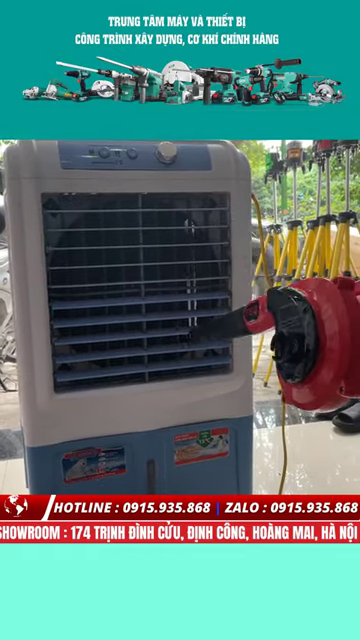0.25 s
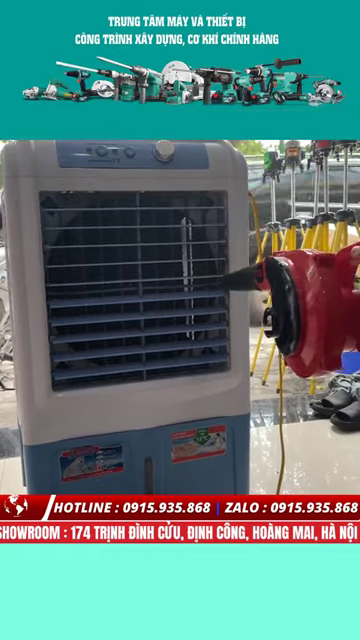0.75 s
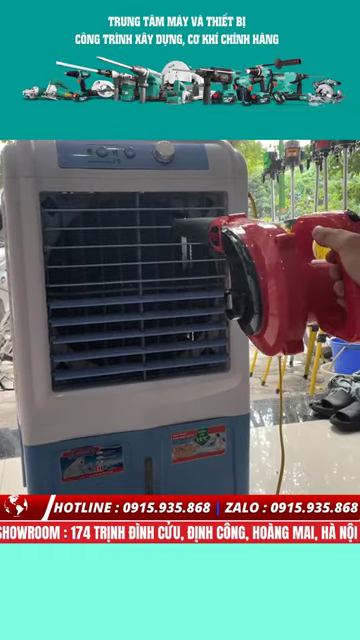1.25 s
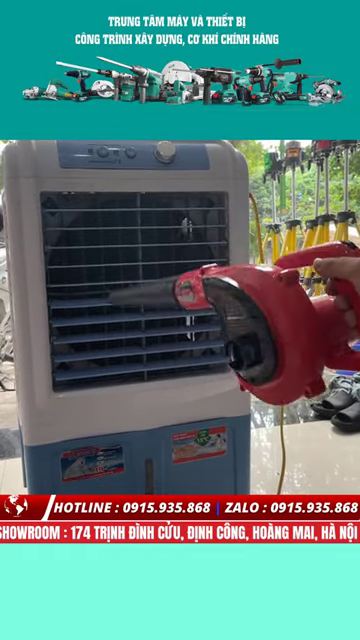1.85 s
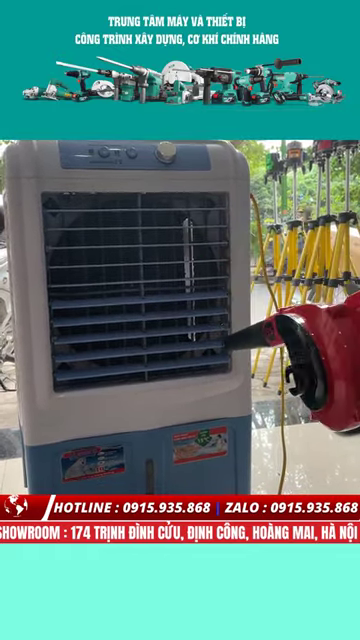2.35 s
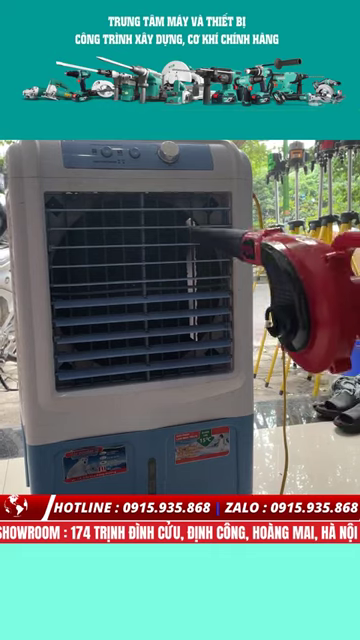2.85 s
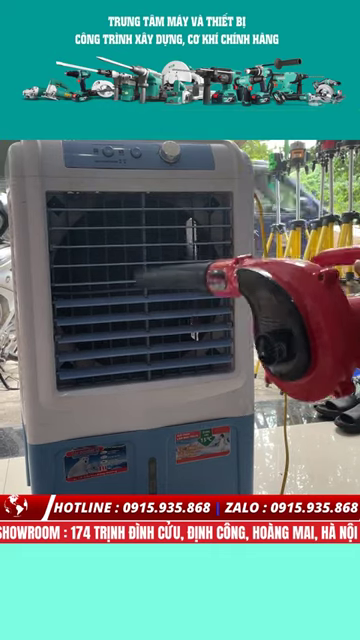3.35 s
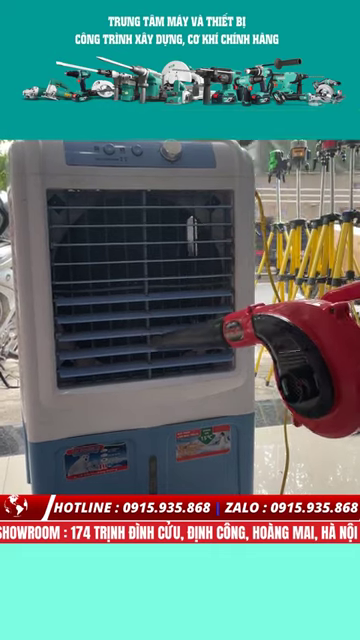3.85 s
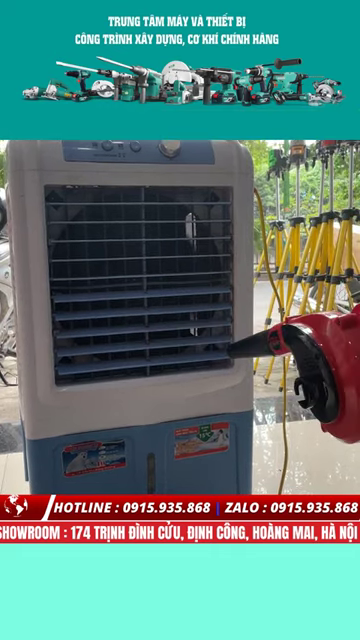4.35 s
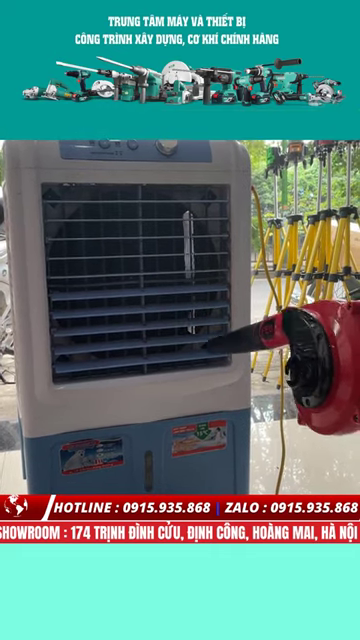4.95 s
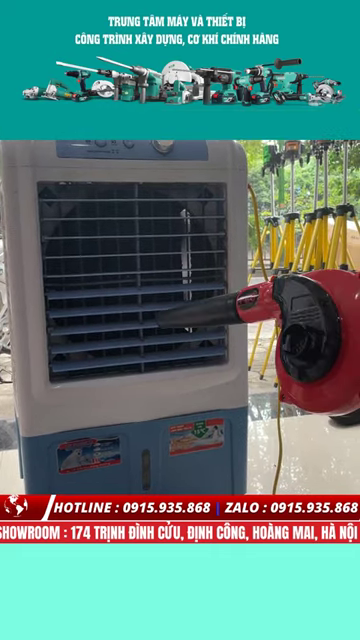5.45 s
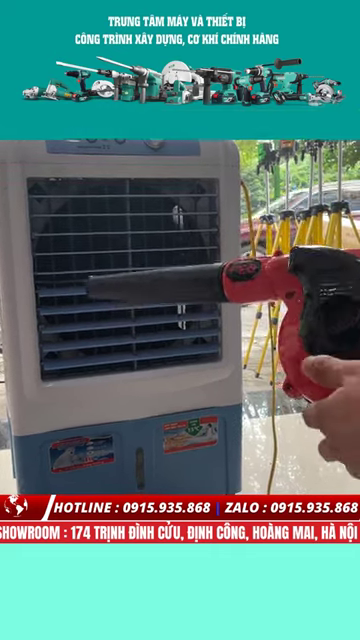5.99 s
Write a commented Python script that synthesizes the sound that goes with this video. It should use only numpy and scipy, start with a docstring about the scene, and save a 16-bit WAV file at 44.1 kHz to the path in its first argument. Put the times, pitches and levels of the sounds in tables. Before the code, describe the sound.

A handheld electric blower runs close by in an open shop front: dense rushing air, a steady high whine and fine motor whirring. Sweeping a cooler's grille makes the roar flutter and hollow howls come and go. Near the end it is switched off; the pitch slides down and the air dies quickly. Faint low traffic, a passing motorbike and a small idling engine lie underneath. Close stereo microphone.

```python
"""In an open shop front a handheld electric blower sweeps an air cooler's grille, then is switched off.
Its jet is shaped noise that roars on the slats and howls at edges, and dies with the shaft's speed.
Ten blades whine over rotor, commutator and bearing lines, all sines locked to the coasting shaft.
In the street noise rumbles, a small engine idles in low puffs that ring its exhaust,
and a motorbike goes by as three multiples of its firing rate."""
import sys
import numpy as np
from scipy import signal
from scipy.fft import rfft, irfft
from scipy.io import wavfile

SR = 44100
rng = np.random.default_rng(int(sys.argv[2]) if len(sys.argv) > 2 else 0)


def waveform_to_disk(signal):
    """Save audio, clipped to [-1, 1], as 16-bit WAV at the path in sys.argv[1]."""
    frames = np.transpose(np.atleast_2d(signal))
    scaled = np.clip(frames, -1, 1) * 32767
    samples = np.round(scaled).astype(np.int16)
    wavfile.write(sys.argv[1], SR, samples)


N = 274302
TIME = np.arange(N) / SR   # seconds
FREQS = np.maximum(np.arange(N // 2 + 1) * SR / N, 1)   # Hz, kept above zero for the logarithm
SIDES = np.array([[1], [-1]])   # left, right
FULL_SPEED_HZ, COAST_SPEED_HZ = 261, 120   # shaft speeds at which the driven and coasting levels hold

# Difference between left and right channels. Each row: frequency in Hz, coherence 0-1 (noise only),
# phase by which the left leads in radians (used above 400 Hz), left minus right in dB.
STEREO = [(270, 1.0, 0, 0), (370, 0.75, 0.05, -1.1), (440, .85, .2, -.7), (520, 0.88, 0.3, -2.8),
          (670, .55, .8, 3.6), (730, 0.38, 0.1, 2.8), (860, .75, .1, 3), (1130, 0.84, 0, 0.6),
          (1330, 0.6, 0.5, 3.2), (1470, .3, -.1, 2), (1700, .55, -.3, 0), (1950, 0.15, -1.8, 1.8),
          (2400, 0.7, 0.4, 0), (2600, .62, .7, .5), (2850, .42, .7, 1.3), (3500, 0.52, 0.3, 2.8),
          (4100, .66, .2, 1.3), (5100, 0.55, 0.8, 3.12), (6500, 0.67, -0.66, 1.22), (7400, .7, -2.2, 1),
          (8100, 0.99, -3.09, 0.1), (8500, .97, -3.25, 0), (9500, 0.62, -4.34, -0.2),
          (11500, 0.98, -6.27, 0.02), (13000, 0.56, -7.29, -0.03), (14400, 0.99, -9.4, 0)]


def from_db(db):
    """Level is logarithmic: 20 dB is a tenfold amplitude."""
    return 10 ** (np.asarray(db) / 20)


def rms_one(x):
    """Effective value: scale a signal to a root mean square of 1."""
    return x / np.sqrt(np.mean(x ** 2) + 1e-20)


def in_time(rows):
    """Linear interpolation of each column of a time curve at every sample."""
    seconds, *columns = np.transpose(rows)
    return [np.interp(TIME, seconds, column) for column in columns]


def in_frequency(rows):
    """Interpolation of each column of a spectrum along logarithmic frequency."""
    hz, *columns = np.transpose(rows)
    return [np.interp(np.log(FREQS), np.log(hz), column) for column in columns]


def drift(rate_hz):
    """Random fluctuation of spread 1: white noise through a two-pole low-pass at this rate."""
    step = 40   # samples between computed points
    pole = np.exp(-2 * np.pi * rate_hz * step / SR)
    white = rng.standard_normal(N // step + 2002)
    slow = signal.lfilter([1], [1, -2 * pole, pole * pole], white)[2000:]   # settled part
    return np.interp(np.arange(N) / step, np.arange(len(slow)), rms_one(slow))


def turns(rate_hz):
    """Phase is the time integral of angular frequency."""
    return 2 * np.pi * np.cumsum(rate_hz) / SR


def tone(angle, scatter, flutter_hz):
    """Multipath interference: a direct sine of rms about 1 plus shifting reflections, unlike at each ear."""
    angle = angle + rng.uniform(0, 2 * np.pi)
    along, across = scatter * np.array([[drift(flutter_hz), drift(flutter_hz)] for _ in range(2)])
    wave = (1 + along) * np.cos(angle) + across * np.sin(angle)
    return wave / np.sqrt(.5 + scatter ** 2)


def resonances(table):
    """Resonance: bell-shaped lifts in dB add up; one row of gains for each lift column."""
    hz, width, *lifts_db = np.transpose(table)
    detuning = 2 * (FREQS - hz[:, None]) / width[:, None]
    return from_db(np.array(lifts_db) @ (1 / (1 + detuning ** 2)))


def turbulence():
    """Partial coherence: the spectrum of white noise, shared between two ears as mid and side."""
    alike = np.clip(in_frequency(STEREO)[0], 0, .998)
    mid, side = rfft(rng.standard_normal((2, N)))
    return np.sqrt(1 + alike) * mid + np.sqrt(1 - alike) * side * SIDES


def reflections(x, echo, delays_ms, sway_ms):
    """Delayed reflection: nearby surfaces throw sound back over paths that change as the hand moves."""
    out, now = x, np.arange(N)
    sway = sway_ms * drift(0.397)
    for delay_ms in delays_ms:
        source_sample = now - (delay_ms + sway) * SR / 1000
        out = out + echo * np.array([np.interp(source_sample, now, ear) for ear in x])
    return out / np.sqrt(1 + len(delays_ms) * echo ** 2)


def rumble():
    """Broadband street noise: a shaped random spectrum whose level rises and falls slowly."""
    # Colour. Each row: frequency in Hz, relative spectral level in dB.
    colour = [(20, -11), (48, 3), (70, -2), (120, 2), (210, -2), (370, -20), (520, -19), (1200, -25)]
    # Loudness. Each row: time in seconds, level in dB.
    traffic = [(0, -41), (.9, -43), (2.2, -40.5), (2.7, -45), (3.2, -41.5), (4.2, -40.5), (4.6, -45),
               (5.3, -43.5), (6.2, -41)]
    noise = rms_one(irfft(turbulence() * from_db(in_frequency(colour)[0]), N))
    return from_db(in_time(traffic)[0]) * noise


def motorbike():
    """Harmonics of the firing rate: they swell as it nears, then sink and dull on a shut throttle."""
    firing_hz, idle_hz, throttle_off_s, rev_down_s = 24.2, 20.9, 1.5, 1.35
    # Multiples of the firing rate heard in the exhaust note.
    multiples = [4, 5, 6]
    # Exhaust note. Each row: time in seconds, relative levels of the 4th, 5th and 6th multiple in dB.
    note = [(0.0, -60, -58, -54), (.35, -58, -56, -46), (.47, -56, -54, -40), (.63, -56, -52, -41),
            (.73, -58, -37, -41), (.9, -54, -44, -37.5), (1.0, -48, -37, -37), (1.18, -40, -38, -38),
            (1.45, -44, -37, -35), (1.56, -46, -44, -50), (1.77, -50, -44, -54), (1.88, -50, -36.5, -52),
            (2.05, -48, -36, -52), (2.2, -50, -44, -50), (2.6, -54, -42, -54), (2.9, -60, -54, -62),
            (4.0, -68, -64, -70)]
    since = np.maximum(TIME - throttle_off_s, 0)
    firing = idle_hz + (firing_hz - idle_hz) * np.exp(-since / rev_down_s)
    angle = turns(firing * (1 + 0.0045 * drift(2.7)))
    out = 0
    for k, db in zip(multiples, in_time(note)):
        out = out + from_db(db) * tone(k * angle, scatter=0.16, flutter_hz=6)[0]   # same at both ears
    return from_db(-3) * out


def idling_engine(uneven_db, jitter_s):
    """Impulsive excitation: each firing of one cylinder is a round puff that sets the exhaust ringing."""
    firing_hz, first_s, puff_hz = 21.42, .0135, 100   # puff_hz: spectral peak of a puff
    # Boom of the pipe, then deep ring of the silencer. Each row: frequency in Hz, width in Hz.
    exhaust = [(63, 14), (44, 6)]
    # Each row: time in seconds, relative levels of puffs, pipe boom and silencer ring in dB.
    idle = [(0.0, -48, -45, -58), (0.7, -48, -45, -60), (0.97, -54, -54, -58), (1.12, -48, -40, -57),
            (1.5, -50, -47, -48), (1.75, -48, -42, -46), (2.15, -50, -48, -46), (2.9, -49, -43, -53),
            (3.35, -46, -41.5, -50), (3.8, -47, -47, -51), (4.5, -56, -55, -53), (5.2, -53, -52, -49),
            (5.55, -42.5, -45, -48), (5.8, -41.5, -43, -64), (5.97, -37.5, -43, -62),
            (6.2, -39.5, -43, -62)]
    count = int(N / SR * firing_hz) + 1
    strength, lateness = rng.standard_normal((count, 2)).T
    at = first_s + np.arange(count) / firing_hz + jitter_s * lateness
    nearest = np.clip(np.round((TIME - first_s) * firing_hz).astype(int), 0, count - 1)
    spread = (np.pi * puff_hz * (TIME - at[nearest])) ** 2
    puffs = from_db(uneven_db * strength[nearest]) * (2 * spread - 1) * np.exp(-spread)
    parts = [puffs]
    for hz, width in exhaust:
        parts.append(signal.lfilter(*signal.iirpeak(hz, hz / width, fs=SR), puffs))
    out = 0
    for db, part in zip(in_time(idle), parts):
        out = out + from_db(db + drift(2.5)) * rms_one(part)
    return from_db(-.5) * out


def street():
    """Long wavelengths: low traffic sounds reach both ears nearly alike."""
    return motorbike() + rumble() + idling_engine(uneven_db=2.1, jitter_s=.0011)


def shaft_speed():
    """Equation of motion: a slight sag under power, then a coast against air drag and friction."""
    start_hz, sag_hz_per_s = 261.27, .115
    switch_off_s, current_fade_s = 4.711, .025
    drag_halves_s, friction_hz_per_s = 1.112, 10.05   # drag alone would halve the speed in this time
    driven = start_hz - sag_hz_per_s * np.minimum(TIME, switch_off_s)
    off_s = current_fade_s * np.logaddexp(0, (TIME - switch_off_s) / current_fade_s)   # soft onset
    return driven / (1 + off_s / drag_halves_s) - friction_hz_per_s * off_s


def partials(angle, coasting, lines, scatter, flutter_hz):
    """Order spectrum: shaft-locked lines move from driven to coasting level; higher ones waver more."""
    out, rate = 0, np.gradient(angle) * SR / (2 * np.pi)
    for multiple, full_db, coast_db in lines:
        audible = multiple * rate < SR / 2 * .8   # guards against aliasing
        level = from_db(full_db + (coast_db - full_db) * coasting)
        out = out + audible * level * tone(multiple * angle, scatter * np.sqrt(multiple), flutter_hz)
    return out


def rotor(angle, coasting):
    """Forced vibration: unbalance, its overtones and the 24-bar commutator sound at turn-rate multiples."""
    # Each row: multiple of the turn rate, relative level at full speed in dB, the same coasting.
    lines = [(1, -40.3, -85), (2, -36.6, -80), (18, -63, -70), (19, -66, -69), (24, -64, -52),
             (25, -68, -65), (28, -72, -63), (34, -72, -66), (35, -66, -62), (36, -66, -62), (48, -56, -61),
             (49, -79, -68), (57, -84, -63), (60, -86, -65), (72, -65, -64), (84, -71, -74), (96, -68, -66),
             (120, -73, -67)]
    return from_db(-1.9) * partials(angle, coasting, lines, scatter=0.04, flutter_hz=5.5)


def ball_bearings(angle, coasting, halvings):
    """Amplitude modulation: ball-pass multiples, some shifted by a turn-rate sideband."""
    passes_per_turn, fade_db_per_halving = 4.371, 11   # the fade acts below half speed
    # Each row: multiple of the ball-pass rate, sideband in turns, relative level at full speed in dB,
    # the same coasting.
    bearings = [(3, 1, -52.5, -68), (5, 0, -55, -68), (5, 1, -60, -66), (6, 0, -60, -65), (6, 1, -68, -63),
                (7, 0, -65, -57), (7, 1, -74, -60), (8, 0, -67, -62), (9, 1, -78, -61), (10, 0, -76, -63),
                (10, 1, -77, -65), (12, 0, -78, -64)]
    lines = [(k * passes_per_turn + side, *levels) for k, side, *levels in bearings]
    out = partials(angle, coasting, lines, scatter=.17, flutter_hz=9)
    return out * from_db(-fade_db_per_halving * np.maximum(halvings - 1, 0))


def upper_whines(angle):
    """Directivity: the armature's twelve slots and the blade tone's octave swell as the blower turns."""
    # Each row: time in seconds, relative level of the slot tone in dB, that of the octave in dB.
    swells = [(0, -51, -51), (.6, -50, -49), (1.1, -62, -56), (1.55, -47, -46), (1.85, -42.5, -48),
              (2.25, -55, -52), (2.5, -53, -44), (2.8, -54, -49), (2.95, -47, -54), (3.2, -47, -56),
              (3.45, -46.5, -45.5), (3.65, -44, -46), (4.1, -46, -45.5), (4.25, -51, -54), (4.4, -50, -47),
              (4.7, -57, -58), (4.85, -58, -55), (6.2, -72, -70)]
    slots_db, octave_db = in_time(swells)
    slots = from_db(slots_db) * tone(12 * angle, scatter=.2, flutter_hz=7)
    octave = from_db(octave_db) * tone(20 * angle, scatter=.22, flutter_hz=7)
    return slots + octave


def motor(angle, coasting, halvings):
    """Source and filter: the falling lines sweep through the shell's fixed resonances and dips."""
    # Shell of the motor. Each row: frequency in Hz, width in Hz, lift in dB.
    shell = [(2335, 180, 9.5), (2720, 240, 7), (3130, 150, 3), (3500, 300, -6), (4050, 200, 3),
             (4400, 350, 6.5), (4820, 300, 7), (5180, 200, -3), (5500, 350, 7), (5850, 400, 4),
             (7650, 300, 3), (8750, 600, 4), (9600, 300, 6), (10650, 700, 12), (12080, 500, 12),
             (13600, 900, 7), (15400, 1400, -17)]
    lines = rotor(angle, coasting) + ball_bearings(angle, coasting, halvings) + upper_whines(angle)
    ringing = irfft(rfft(lines) * resonances(shell), N)
    return reflections(ringing, echo=.2, delays_ms=[2.9, 6.7], sway_ms=.1)


def blade_whine(angle, speed, halvings):
    """Blade-pass tone: ten blades a turn, beamed between the ears and swept through the casing."""
    loss_db_per_halving = 9
    # Beam. Each row: time in seconds, level in dB before speed loss and casing, left minus right in dB,
    # phase by which the left leads in radians; the stereo table adds its own differences.
    beam = [(0.0, -43, -2, -1.3), (0.08, -31.5, -6, -.9), (0.3, -39.5, 1, -.5), (0.53, -38.5, -4, -1),
            (0.66, -32, -2, -0.29), (0.94, -33, 1, -.6), (1.04, -37, -1, -4), (1.25, -27.5, -1, 0.6),
            (1.42, -26, -3, 0.4), (1.5, -31, -2, -0.074), (1.71, -30.5, -5, .2), (1.8, -42, 0, 1.1),
            (1.88, -32.5, -2, 0.63), (2.01, -46, 0, 0), (2.1, -40, 0, 0.5), (2.28, -32.5, 1, 1.3),
            (2.4, -31, 5, 0), (2.55, -33, 1, 0.5), (2.68, -34.5, 0, -1.2), (2.74, -46, 0, 1.7),
            (2.86, -34, 3, 1), (2.97, -33.5, 3, 1.3), (3.06, -28.5, -4, 0.9), (3.32, -31.5, -2, -0.024),
            (3.4, -38, 7, 3), (3.56, -40, 1, -0.5), (3.75, -34, 2, -1.5), (3.93, -32, 4, -1.5),
            (4.18, -32.5, 3, -2), (4.3, -51.5, 5, 2), (4.43, -34.5, 7, -.6), (4.65, -35.5, 3, -1),
            (4.71, -46, 3, -.7), (4.77, -35.5, 1, -1)]
    # Fan casing's resonances and dips. Each row: frequency in Hz, width in Hz, lift in dB.
    casing = [(2355, 110, 13), (2265, 50, -9), (2120, 170, 9), (2010, 50, -13), (1880, 260, 9.5),
              (1540, 100, -10), (1440, 80, -10), (1350, 150, 4), (1175, 35, -6), (1060, 220, 11)]
    beam_db, balance_db, lead = in_time(beam)
    level_db = beam_db + SIDES * balance_db / 2 - loss_db_per_halving * halvings
    casing_gain = np.interp(10 * speed, FREQS, resonances(casing)[0])
    wave = tone(10 * angle + SIDES * lead / 2, scatter=0.17, flutter_hz=20)
    return from_db(level_db) * casing_gain * wave


def howls(rough_db):
    """Vortex shedding: where the jet catches a slat or frame, narrow noise bands swell and let go."""
    # Each row: centre in seconds, half length in seconds (to 1/e), frequency in Hz, width in Hz,
    # peak level in dB before the roughness.
    catches = [(.33, 0.34, 4630, 130, -39), (0.848, 0.35, 2440, 260, -32.5),
               (0.955, 0.099, 3790, 258, -32.5), (1.204, 0.028, 980, 150, -34),
               (1.315, 0.021, 1020, 120, -29), (1.65, 0.34, 3330, 300, -39), (2.354, 0.088, 1160, 260, -31),
               (2.44, 0.17, 1560, 560, -29), (2.585, 0.022, 1110, 240, -28), (2.522, .05, 2300, 140, -34.5),
               (3.113, 0.17, 3390, 240, -37), (4.44, 0.13, 1790, 260, -32.5),
               (4.55, 0.35, 2350, 220, -33.5), (4.694, 0.042, 2320, 60, -32.5)]
    out, noise = 0, irfft(turbulence(), N)
    for s, half_length, hz, width, db in catches:
        edges_hz = [hz - width / 2, hz + width / 2]
        band = signal.sosfilt(signal.butter(2, edges_hz, "band", fs=SR, output="sos"), noise)
        swell = np.exp(-np.abs((TIME - s) / half_length) ** 3)
        out = out + from_db(db) * swell * rms_one(band)
    return out * from_db(rough_db * drift(30))


def air(halvings, coasting):
    """Jet turbulence: noise follows speed and aim; the housing's coloration shifts as the jet dies."""
    # Colour of the jet. Each row: frequency in Hz, relative spectral level in dB.
    jet = [(200, -7.5), (380, -9.5), (520, -1.5), (680, -4.5), (1120, 1), (1900, -6.5), (2400, -3.5),
           (3700, -6.5), (5000, -9.5), (7000, -9.5), (9100, -15), (12500, -17), (14000, -18), (15500, -37)]
    # Housing and nozzle. Each row: frequency in Hz, width in Hz, lift at full speed in dB, coasting in dB.
    housing = [(335.5, 110, 4.5, 14.5), (440, 51, 4.5, 7.5), (1046, 120, -1, 7.5), (1130, 110, 1.5, 1),
               (1260, 180, -1.5, -3), (1856, 240, 2.5, 8.5), (2350, 30, 1.5, 4), (2580, 120, 3, -2),
               (2850, 32, 0.5, 9), (3035, 59, 5, 2), (3707, 39, 6, 5), (3860, 64, 4.5, 5),
               (4430, 1300, 3, 4), (5450, 280, 3.5, 0), (6080, 190, 3.5, 3)]
    # Nozzle over the grille. Each row: time in seconds, swing of the slat roar in dB, of the hiss in dB.
    aim = [(0.0, 3, -2), (0.1, 2, -0.5), (0.27, -1.5, -1.9), (0.45, 0.0, -1), (0.68, 2, 1), (0.95, 1, 0.5),
           (1.2, 1, -1), (1.42, -1.2, 0), (1.62, -0.5, -1.8), (2.12, -2, -1.2), (2.3, 4.5, -1.5),
           (2.58, 1, -0.4), (2.7, 1, 0.1), (3.1, 0, -1.5), (3.6, -1.5, -3), (4.25, -1.1, -1.5),
           (4.45, -0.5, 0.2), (4.7, 1.5, -0.5)]
    # Edges in Hz of four bands: body rush, roar on the slats, nozzle rush, hiss.
    edges_hz = [170, 800, 2000, 4000, 18000]
    # Each row, one per band: relative level at full speed in dB, loss in dB per halving of speed,
    # share of the roar's swing, share of the hiss's swing, steady rubbing noise of the motor in dB.
    bands = [(-33.5, 14, 0.21, 0.12, -45.5), (-29, 18.5, 0.95, .05, -48), (-30, 22, 0.55, 0.51, -51),
             (-31, 21.5, 0.3, 1, -44)]
    # Flutter of the eddies in each band, rms in dB.
    eddies_db = [.5, 1.1, .65, .55]
    noise = turbulence() * from_db(in_frequency(jet)[0])
    driven, free = resonances(housing)
    roar_db, hiss_db = in_time(aim)
    out = 0
    for low, high, band, eddy_db in zip(edges_hz, edges_hz[1:], bands, eddies_db):
        full_db, loss_db, roar_share, hiss_share, rub_db = band
        zone = noise / (1 + (low / FREQS) ** 12) / (1 + (FREQS / high) ** 12)
        driven_rush = rms_one(irfft(zone * driven, N))
        free_rush = rms_one(irfft(zone * free, N))
        rush = (1 - coasting) * driven_rush + coasting * free_rush
        aim_db = roar_share * roar_db + hiss_share * hiss_db
        jet_db = full_db - loss_db * halvings + aim_db + eddy_db * drift(16)
        out = out + rush * np.hypot(from_db(jet_db), from_db(rub_db))   # powers add
    # the cooler's face, the floor and a wall
    out = reflections(out, echo=0.16, delays_ms=[3.2, 7.7, 13.9], sway_ms=0.259)
    return from_db(-0.79) * out


def blower():
    """Common drive: air, blade whine and motor lines all follow the speed of one shaft."""
    speed = shaft_speed()
    halvings = np.log2(FULL_SPEED_HZ / speed)
    coasting = np.clip((FULL_SPEED_HZ - speed) / (FULL_SPEED_HZ - COAST_SPEED_HZ), 0, 1)
    angle = turns(speed * (1 + .00015 * drift(12)))
    whirring = motor(angle, coasting, halvings) + blade_whine(angle, speed, halvings)
    return whirring + howls(rough_db=1.5) + air(halvings, coasting)


def scene():
    """Superposition: the street behind, the blower close by."""
    return street() + blower()


def record(dry):
    """Stereo difference and low-pass: left and right differ in phase and level; the top is cut."""
    cutoff_hz = 15650
    _, lead, balance_db = in_frequency(STEREO)
    lead = lead * (FREQS > 400)   # low frequencies stay in phase
    difference = from_db(SIDES * balance_db / 2) * np.exp(1j * SIDES * lead / 2)
    pair = irfft(rfft(dry) * difference, N)
    return signal.sosfilt(signal.ellip(12, .1, 80, cutoff_hz, fs=SR, output="sos"), pair)


dry = scene()
out = record(dry)
waveform_to_disk(out)
```